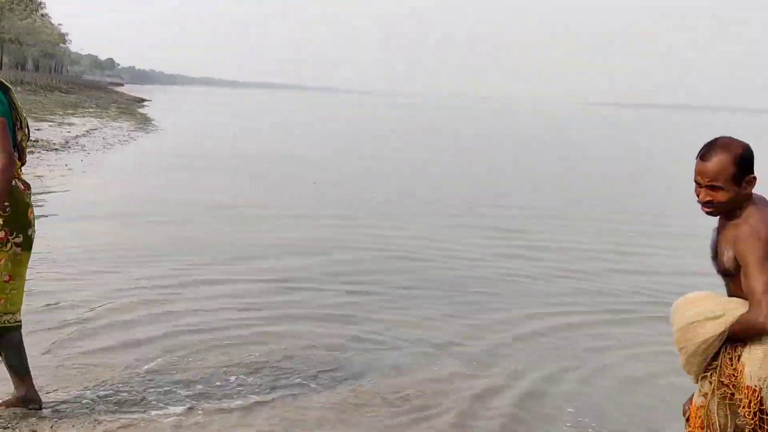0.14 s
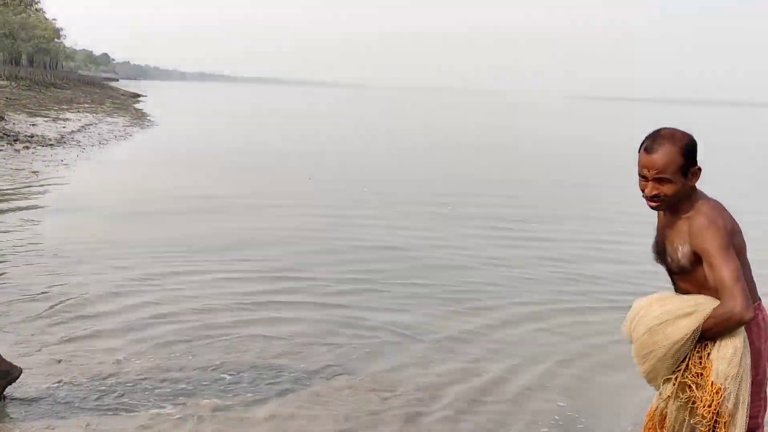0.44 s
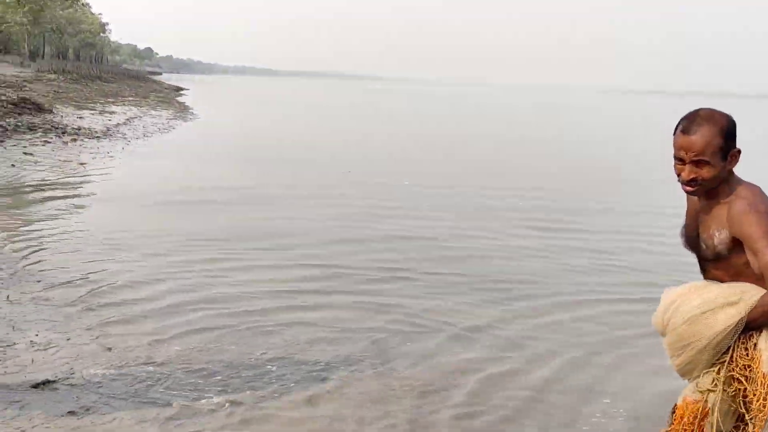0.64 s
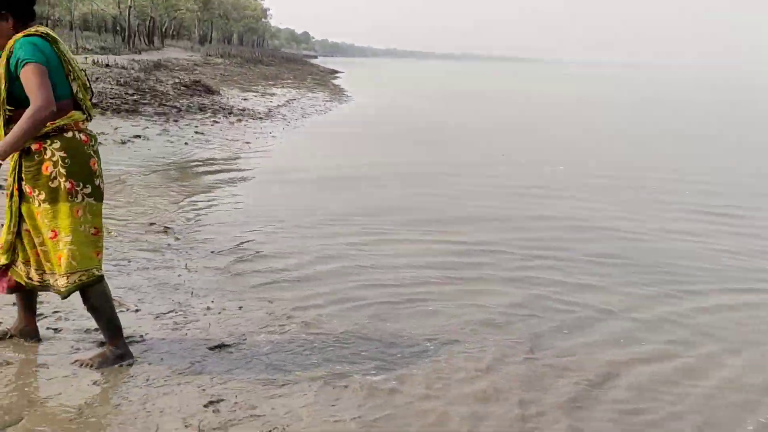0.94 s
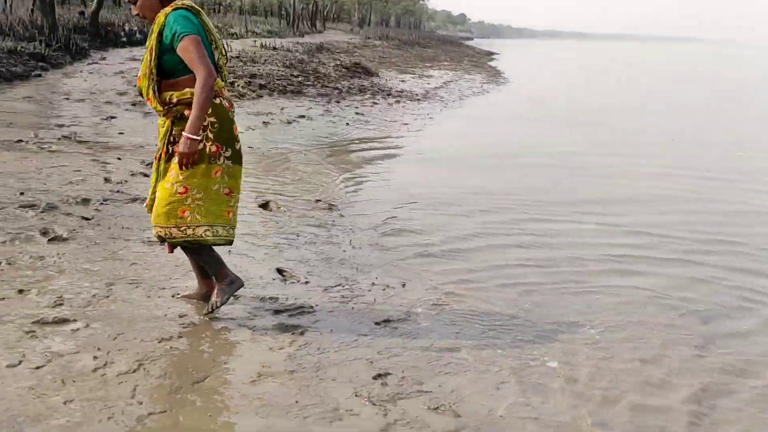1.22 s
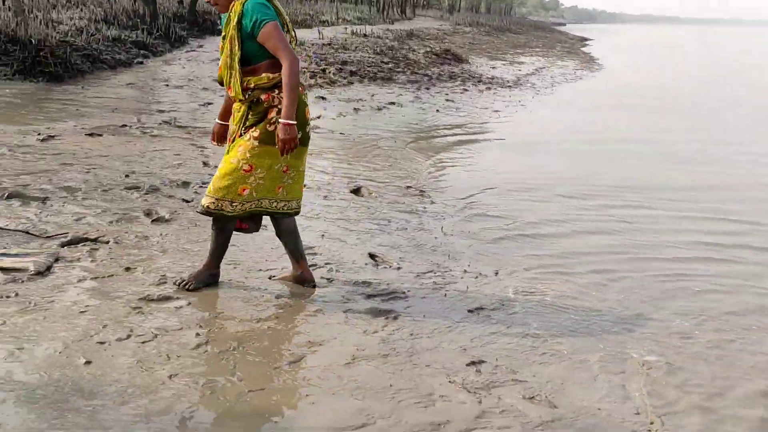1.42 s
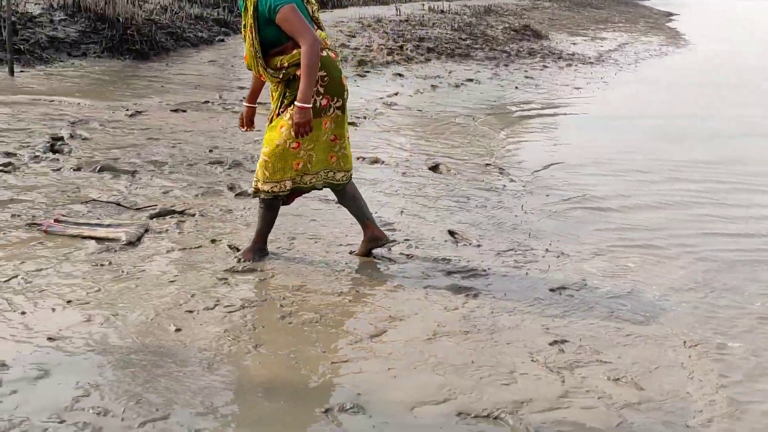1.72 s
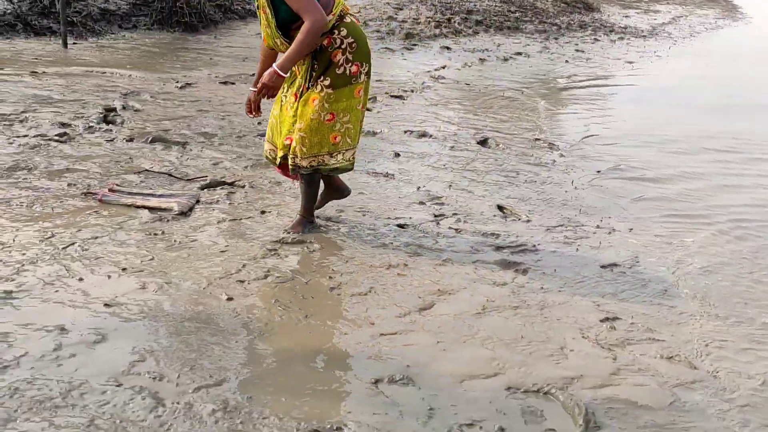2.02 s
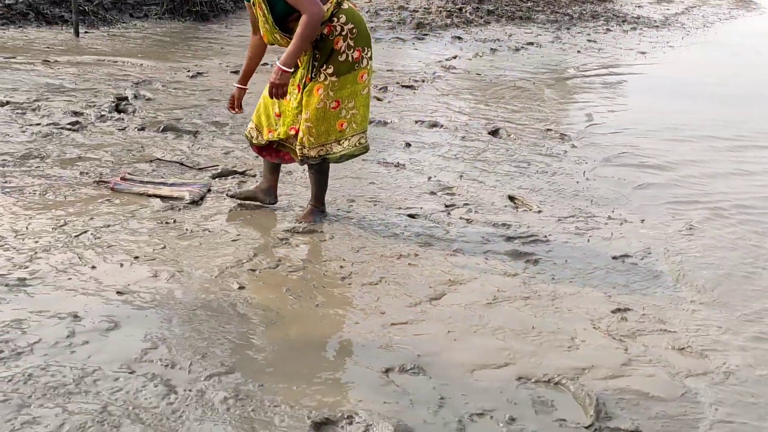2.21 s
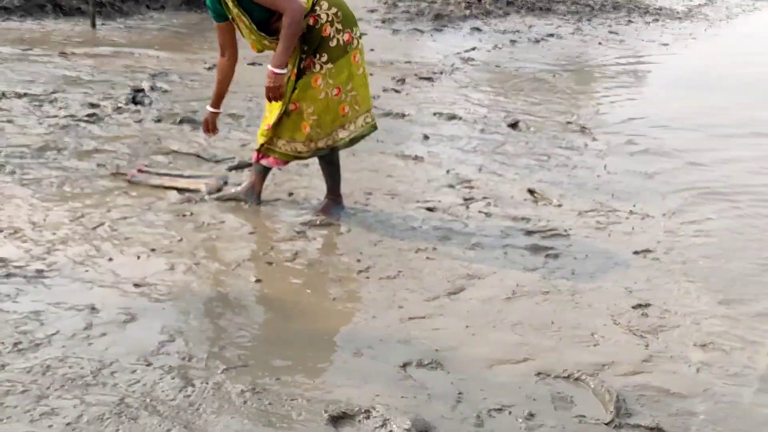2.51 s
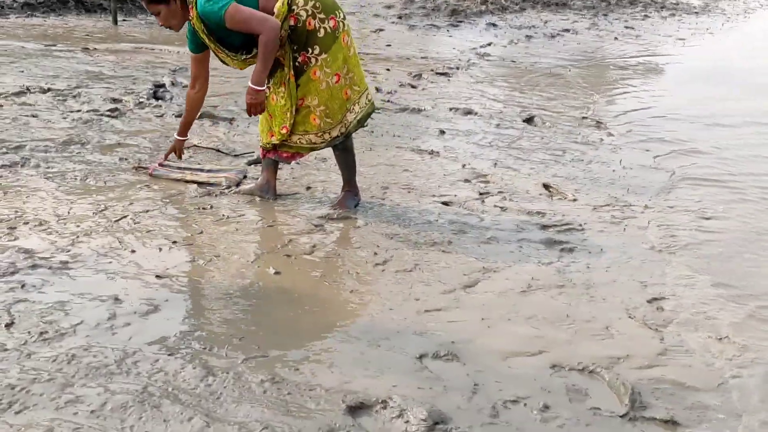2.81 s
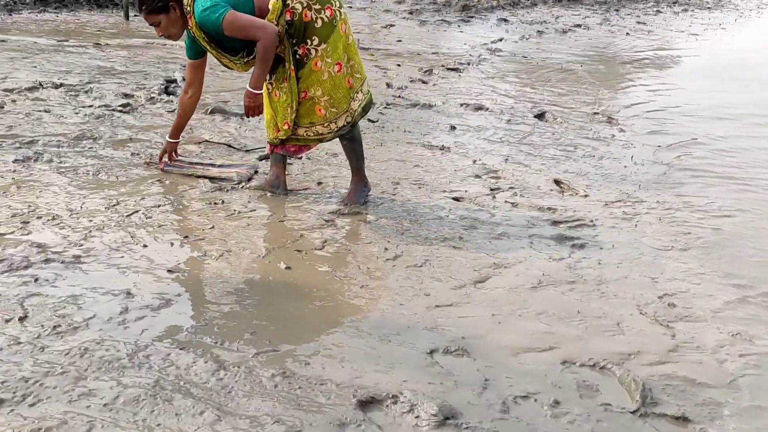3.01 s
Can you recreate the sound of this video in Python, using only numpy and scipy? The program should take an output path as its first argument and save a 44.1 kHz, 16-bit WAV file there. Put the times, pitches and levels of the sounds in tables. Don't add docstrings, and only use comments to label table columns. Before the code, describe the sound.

Muddy wading steps close by: low bubbly plops, one sharp water smack, then fizzing little splashes.

```python
import sys
import numpy as np
from scipy import signal
from scipy.fft import rfft, irfft, next_fast_len
from scipy.io import wavfile
from scipy.ndimage import uniform_filter1d, minimum_filter1d, map_coordinates

SR = 44100
rng = np.random.default_rng(int(sys.argv[2]) if len(sys.argv) > 2 else 0)


def linear_from_db(decibels):
    return 10 ** (np.asarray(decibels, float) / 20)


def file_out(sig):
    cols = np.atleast_2d(sig).T
    lim = np.clip(cols, -1, 1)
    pcm = np.round(lim * 32767).astype(np.int16)
    wavfile.write(sys.argv[1], SR, pcm)


N = 138915

# (time [s], delay of the right ear [samples])
WALKER_BEARING = [(0, 6.54), (.25, 5.3), (.5, 3.57), (.8, 6.18), (1, 11.1), (1.25, 13.2), (1.6, 14.1),
                  (2, 15.4), (2.4, 13.3), (2.8, 13.3), (3.15, 10.2)]
# (left ear [Hz], right ear [Hz], width [Hz], depth [0-1])
ECHO_DIPS = [(547, 675, 165, 0.69), (7410, 7040, 370, 0.43), (11150, 9800, 354, 0.64)]


def evened(x):
    return x / np.sqrt(np.mean(x ** 2) + 1e-20)


def read(points, hz):
    f, value = np.transpose(points)
    return np.interp(np.log(hz + 1), np.log(f + 1), value)


def colour(x, gain):
    size = next_fast_len(N + 4096)
    hz = np.fft.rfftfreq(size, 1 / SR)
    return irfft(rfft(x, size) * gain(hz), size)[..., :N]


def add(mix, s, sound):
    part = mix[round(s * SR):][:len(sound)]
    part += sound[:len(part)]


def bubble(hz, t60, rise_cycles, glide):
    rise_s = rise_cycles / hz
    t = np.arange(0, t60 + 3 * rise_s, 1 / SR)
    start = 1 - np.exp(-(t / rise_s) ** 2)
    shape = start * linear_from_db(-60 * np.maximum(t - rise_s, 0) / t60)
    return shape / shape.max() * np.sin(2 * np.pi * hz * (t + glide * t ** 2 / t[-1]))


def bubbles(rows, rise_cycles, lead_cycles, glide, puff_db, puff_s, puff_cycles):
    out = np.zeros(N)
    u = np.arange(int(puff_s * SR)) / (puff_s * SR)
    for s, db, hz, t60 in rows:
        noise = rng.standard_normal(len(u)) * np.minimum(u / 0.057, 1) * linear_from_db(-60 * u)
        puff = np.convolve(noise, bubble(hz, puff_cycles / hz, 0.41, 0))
        add(out, s - lead_cycles / hz, linear_from_db(db) * bubble(hz, t60, rise_cycles, glide))
        add(out, s, linear_from_db(db + puff_db) * puff / abs(puff).max())
    return out


def gulps():
    gulp_rows = [(0.051, -37, 374, 0.043), (0.102, -40, 400, 0.058), (0.151, -39, 380, 0.068),
                 (0.203, -36.5, 369, 0.066), (0.275, -37.5, 360, 0.065), (0.626, -40, 471, 0.052),
                 (0.686, -39, 342, 0.027), (0.813, -27, 266, 0.029), (0.851, -21.5, 370, 0.024),
                 (0.861, -25, 460, 0.038), (0.873, -31, 348, 0.05), (0.977, -28.5, 194, 0.027),
                 (1.33, -34, 440, 0.025), (1.344, -29, 408, 0.046), (1.364, -24.5, 290, 0.02),
                 (1.478, -32, 293, 0.047), (1.493, -24.5, 264, 0.043), (1.506, -21, 324, 0.022),
                 (1.584, -35, 362, 0.087), (1.61, -31.5, 386, 0.023), (2.041, -29, 560, 0.059),
                 (2.089, -34.5, 360, 0.027), (2.247, -36, 360, 0.09), (2.829, -16.5, 381, 0.032),
                 (2.864, -31, 388, 0.031), (2.896, -34, 365, 0.043), (2.918, -22.5, 397, 0.04),
                 (2.949, -24.5, 384, 0.038), (3.02, -30.5, 308, 0.049), (3.031, -33, 340, 0.036),
                 (.19, -51, 75, .1), (.72, -44.5, 70.4, 0.084), (1.765, -42, 69.4, 0.081),
                 (.322, -49, 280, 0.044), (1.1, -47.5, 337, 0.057), (1.256, -43, 277, 0.036),
                 (2.522, -43.5, 415, 0.056)]
    return bubbles(gulp_rows, rise_cycles=2.33, lead_cycles=0.85, glide=0.12,
                   puff_db=-12, puff_s=0.041, puff_cycles=3.7)


def squelches():
    # (time [s], peak [dB], pitch [Hz])
    squelch_rows = [
        (.053, -32, 715),
        (.69, -32, 615),
        (.858, -34, 536),
        (1.335, -35, 520),
        (1.559, -41, 457),
        (2.182, -37, 553),
        (2.206, -35, 603),
        (2.265, -35.5, 480),
    ]
    rows = [(*row, 0.059) for row in squelch_rows]
    return bubbles(rows, rise_cycles=1.14, lead_cycles=0.61, glide=0.24,
                   puff_db=-9, puff_s=0.045, puff_cycles=3.7)


def plops():
    # (time [s], peak [dB], pitch [Hz])
    plop_rows = [(0.004, -33, 970), (0.03, -32.5, 980), (0.229, -29, 920), (0.29, -35, 997),
                 (0.297, -32, 1010), (.106, -45, 890), (.89, -35.5, 890), (.908, -38.5, 920),
                 (1.002, -37, 1000), (1.165, -36, 1060), (2.878, -39, 980), (3.075, -40, 1020),
                 (0.447, -43, 1140), (0.573, -37.5, 830), (0.627, -35.5, 850), (0.99, -27, 804),
                 (1.061, -33.5, 1010), (1.108, -33.5, 926), (1.192, -39.5, 990), (1.338, -37.5, 860),
                 (1.443, -37.5, 850), (1.578, -32, 1115), (1.637, -36, 925), (1.68, -31.5, 1090),
                 (2.075, -33, 960), (2.185, -39, 886), (2.244, -36, 985), (2.296, -37.5, 910),
                 (2.843, -36, 940), (2.916, -31, 1120), (2.971, -27.5, 1070)]
    rows = [(*row, 0.022) for row in plop_rows]
    return bubbles(rows, rise_cycles=1.42, lead_cycles=0.79, glide=0.13,
                   puff_db=-0.39, puff_s=0.045, puff_cycles=5.3)


def ticks():
    # (time [s], peak [dB], pitch [Hz])
    tick_rows = [(0.0054, -29.5, 8200), (0.213, -40, 7960), (0.2362, -29, 2000), (0.9458, -38, 4850),
                 (1.3912, -32.5, 3900), (1.3939, -36, 3100), (1.3905, -46, 12300), (1.397, -39, 10200),
                 (.2134, -45, 4520), (0.214, -36.5, 12500), (.469, -31, 5450), (0.7193, -36, 2880),
                 (.8899, -42, 4050), (1.0595, -39, 4260), (1.8766, -37.5, 5230), (2.0615, -34.5, 3080),
                 (2.2218, -35, 3900), (2.4889, -42.5, 6600), (2.5114, -40.5, 3810), (3.103, -39, 5340),
                 (2.1748, -28, 11400), (1.7437, -31.5, 3400), (2.096, -40, 2770), (2.147, -27, 8000),
                 (2.175, -26.5, 6340), (2.2417, -29, 2550), (2.811, -32.5, 9600)]
    rows = [(*row, 0.018) for row in tick_rows]
    return linear_from_db(-7) * bubbles(rows, rise_cycles=1.1, lead_cycles=0.1, glide=0.07,
                             puff_db=7.56, puff_s=0.02, puff_cycles=4.3)


def slap():
    # (pitch [Hz], level [dB], time to fade by 60 dB [s])
    slap_rings = [
        (830, -6, 0.0083),
        (4330, -26.5, 0.046),
        (7720, -23.5, 0.024),
        (3400, -11.5, 0.023),
        (560, -24, 0.021),
    ]
    t, out = np.arange(3000) / SR, np.zeros(N)
    rings = sum(linear_from_db(db - 60 * t / t60) * np.sin(2 * np.pi * hz * t) for hz, db, t60 in slap_rings)
    rings = rings * np.minimum(t / 0.00094, 1)
    band = signal.butter(2, [2800, 13000], "band", fs=SR)
    noise = signal.lfilter(*band, rng.standard_normal(3000))
    crack = noise * np.minimum(t / 0.0018, 1) * linear_from_db(-17 - 60 * t / 0.027)
    add(out, 0.8158, rings + crack)
    return out


def gurgles():
    # (start [s], length [s], level [dB], first pitch [Hz], last pitch [Hz])
    gurgle_rows = [(0.093, 0.18, -49, 355, 396), (.2, 0.21, -47, 263, 340), (.36, 0.15, -47, 399, 348),
                   (0.681, 0.13, -46, 523, 302), (0.861, 0.096, -42, 402, 353),
                   (0.968, 0.059, -43, 324, 350), (1.325, 0.065, -37, 414, 500),
                   (1.376, 0.038, -45.5, 238, 200), (1.428, 0.071, -49, 314, 200),
                   (1.516, .14, -42, 430, 395), (1.541, 0.12, -45, 264, 294),
                   (2.009, 0.074, -44.5, 402, 490), (2.072, 0.075, -47.5, 405, 430),
                   (2.204, 0.069, -47, 334, 445), (2.27, .06, -44, 496, 560), (2.843, 0.15, -44, 420, 423),
                   (2.954, 0.044, -39.5, 423, 240), (2.981, 0.055, -47, 242, 355),
                   (3.091, .05, -52, 300, 360)]
    width_hz, slips_per_s, attack = 74, 260, 0.38
    out, r = np.zeros(N), np.exp(-np.pi * width_hz / SR)
    for s, length, db, from_hz, to_hz in gurgle_rows:
        u = np.arange(0, length, 1 / SR) / length
        slipping = rng.random(len(u)) < slips_per_s / SR
        turn = np.exp(2j * np.pi * np.cumsum(from_hz + (to_hz - from_hz) * u) / SR)
        slips = rng.standard_normal(len(u)) * (0.032 + slipping)
        ring = (turn * signal.lfilter([1], [1, -2 * r, r * r], slips / turn)).real
        add(out, s, linear_from_db(db) * evened(ring) * np.sqrt(np.sin(np.pi * u ** attack)))
    return out


def snaps():
    # (time [s], peak [dB])
    snap_rows = [
        (0.2143, -36),
        (.469, -43),
        (0.9449, -37),
        (1.0595, -45),
        (1.3924, -32),
        (2.176, -37),
        (2.811, -44),
        (.006, -38),
    ]
    t, out = np.arange(800) / SR, np.zeros(N)
    high = signal.butter(2, 2800, "high", fs=SR)
    for s, db in snap_rows:
        noise = signal.lfilter(*high, rng.standard_normal(800))
        add(out, s, noise * np.minimum(t / 0.0005, 1) * linear_from_db(db - 60 * t / 0.0069))
    return out


def grains(per_s, spread_db, low_hz, high_hz, cycles, tilt, count=30):
    size = linear_from_db(spread_db * np.minimum(rng.exponential(1, N), 4)) * (rng.random(N) < per_s / SR)
    kind, out = rng.integers(0, count, N), np.zeros(N)
    for k, hz in enumerate(np.geomspace(low_hz, high_hz, count)):
        ping = tilt(hz) * bubble(hz, cycles / hz, 1.25, 0.23)
        out += signal.oaconvolve(size * (kind == k), ping)[:N]
    return evened(out)


def patchy(x, patch_db):
    z = signal.stft(x, nperseg=512)[2]
    field = uniform_filter1d(rng.standard_normal(z.shape), size=9, axis=0)
    field = uniform_filter1d(field, size=9, axis=1)
    return signal.istft(z * linear_from_db(patch_db * evened(field)), nperseg=512)[1][:N]


def stir(column):
    # (time [s], trickle level [dB], churn level [dB])
    stir_rows = [(0, -60, -46.5), (.3, -51.5, -51.5), (.62, -58, -46), (.9, -52, -54.5), (1.2, -59, -50.5),
                 (1.45, -55, -43), (1.62, -52.5, -49), (1.9, -54, -51), (2.2, -51.5, -55),
                 (2.45, -58.5, -61), (2.7, -57, -58), (2.9, -50.5, -52), (3.15, -48, -60)]
    table = np.array(stir_rows)
    return linear_from_db(np.interp(np.arange(N) / SR, table[:, 0], table[:, column]))


def churn(level):
    # (bubble pitch [Hz], level [dB])
    churn_tone = [(200, -16.5), (350, -2), (600, 2), (950, 3.5), (1300, -5.5), (2000, -7.5)]
    crowd = grains(per_s=1500, spread_db=3.2, low_hz=195, high_hz=2014, cycles=14.4,
                   tilt=lambda hz: linear_from_db(read(churn_tone, hz)) * np.sqrt(hz))
    return (linear_from_db(-0.5) * stir(column=2) + 0.4 * level) * evened(patchy(crowd, 3.04))


def spray_level():
    # (start [s], length [s], level [dB])
    splash_rows = [(0, 0.048, -41.5), (0.203, 0.16, -43.5), (0.435, 0.096, -42.5), (0.83, 0.074, -55),
                   (0.983, 0.07, -41), (1.202, 0.028, -48.5), (1.393, .025, -60), (1.476, 0.39, -47),
                   (2.079, 0.11, -42), (2.118, 0.17, -41), (2.201, 0.15, -42.5), (2.414, 0.046, -44),
                   (2.8, 0.046, -62), (2.82, 0.25, -43.5), (2.957, 0.081, -37), (3.045, 0.055, -39),
                   (3.11, .05, -46)]
    t, power = np.arange(N) / SR, (linear_from_db(4.5) * stir(column=1)) ** 2
    for s, length, db in splash_rows:
        u = np.clip((t - s) / length, 0, 1)
        power = power + linear_from_db(2 * db) * np.sin(np.pi * u ** 0.48) ** 2
    flicker = uniform_filter1d(rng.standard_normal(N), size=500)
    flicker = evened(uniform_filter1d(flicker, size=500))
    return np.sqrt(power) * linear_from_db(2.12 * flicker)


def spray():
    # (frequency [Hz], level per Hz [dB])
    spray_tone = [(300, -9.5), (1000, 4.5), (2000, 0.5), (4000, -2), (8000, -6.5), (11000, -4),
                  (15500, -14.5)]
    fizz = grains(per_s=5000, spread_db=3.05, low_hz=1220, high_hz=15760, cycles=5.4,
                  tilt=lambda hz: hz / 1000)
    hiss = rng.standard_normal(N)
    water = colour(0.56 * fizz + 0.74 * hiss, lambda hz: linear_from_db(read(spray_tone, hz)))
    return evened(patchy(water, 3.34))


def air():
    # (frequency [Hz], level per Hz [dB])
    air_tone = [(35, -38), (65, -4.5), (100, 2.5), (180, -5.5), (400, -8), (1000, -11.5), (2500, -19.5),
                (15000, -23)]
    a, b, c = rng.standard_normal((3, N))
    same = lambda hz: 1 / np.sqrt(1 + (hz / 470) ** 2)
    both = colour(a, same) + colour(np.array([b, c]), lambda hz: np.sqrt(1 - same(hz) ** 2))
    return linear_from_db(-52) * evened(colour(both, lambda hz: linear_from_db(read(air_tone, hz))))


def scene():
    level = spray_level()
    share = lambda hz: 0.84 * hz ** 2 / (hz ** 2 + 1480 ** 2)
    near = gulps() + squelches() + plops() + ticks() + slap() + gurgles() + snaps() + churn(level)
    near = near + level * colour(spray(), lambda hz: np.sqrt(1 - share(hz) ** 2))
    when, late = np.transpose(WALKER_BEARING)
    heard_at = np.arange(N) - np.interp(np.arange(N) / SR, when, late)
    lagged = map_coordinates(near, [heard_at], order=5, mode="nearest")
    wide = level * colour(np.array([spray(), spray()]), share)
    return np.array([near, lagged]) + wide + air()


def band_gaps(x):
    mid_side = np.array([x[0] + x[1], x[0] - x[1]]) / 2
    hz, t, z = signal.stft(mid_side, SR, nperseg=2048, noverlap=1536)
    field = uniform_filter1d(rng.standard_normal((3, 129, len(t))), size=5, axis=2)
    field = field.repeat(8, axis=1)[:, :len(hz)]
    treble = uniform_filter1d(np.diff(x, 2, append=0) ** 2, size=64).sum(0)
    peak = -minimum_filter1d(-treble, size=2048)
    sharp = peak / uniform_filter1d(treble, size=2048) > linear_from_db(2 * 9.5)
    opened = sharp[np.minimum(t * SR, len(sharp) - 1).astype(int)]
    turn = np.pi * hz[:, None] * np.interp(t, *np.transpose(WALKER_BEARING)) / SR
    weak = np.array([np.sin(turn), np.cos(turn)]) ** 12 / (1 + turn / 4)
    dips = sum(depth * np.exp(-((hz - f) / width) ** 2) for f, _, width, depth in ECHO_DIPS)
    weak = weak + 1.7 * dips[:, None]
    shut = (evened(field[:2] + 1.3 * field[2]) + weak > 0.42) & ~opened
    makeup = linear_from_db(2.6 * ~opened)
    gain = np.where(hz[:, None] > 1250, makeup * ~shut, 1)
    mid, side = signal.istft(z * gain, SR, nperseg=2048, noverlap=1536)[1][:, :N]
    return np.array([mid + side, mid - side])


def band_limit(x):
    return signal.sosfilt(signal.butter(12, 15850, fs=SR, output="sos"), x)


def record(dry):
    # (frequency [Hz], level of the right ear [dB])
    right_tone = [(300, -1.55), (1000, 0), (3000, -2), (8000, 1.5), (11000, -7), (15000, -9)]

    def ear(side):
        return lambda hz: np.prod([1 - row[3] * np.exp(-((hz - row[side]) / row[2]) ** 2)
                                   for row in ECHO_DIPS], axis=0)

    left = colour(dry[0], ear(side=0))
    right = colour(colour(dry[1], ear(side=1)), lambda hz: linear_from_db(read(right_tone, hz)))
    low_cut_hz, edge_hz = 52.5, 15600
    band = lambda hz: (hz < edge_hz) * hz ** 2 / (hz ** 2 + low_cut_hz ** 2)
    both = colour(np.array([left, right]), band)
    return band_limit(band_gaps(both))


dry = scene()
out = record(dry)
file_out(out)
```